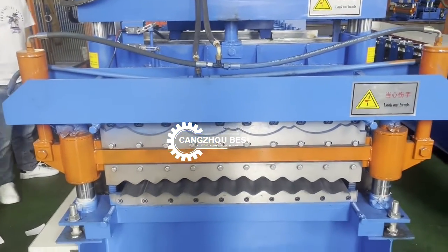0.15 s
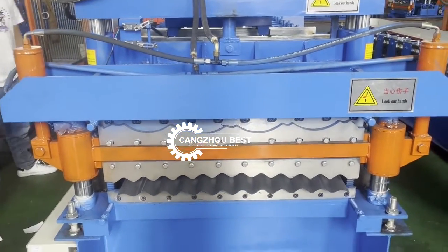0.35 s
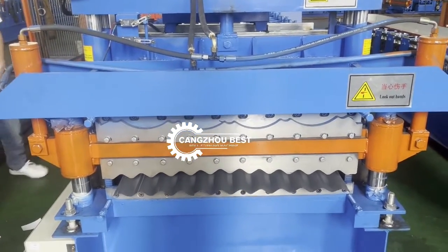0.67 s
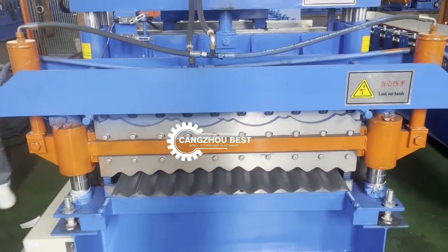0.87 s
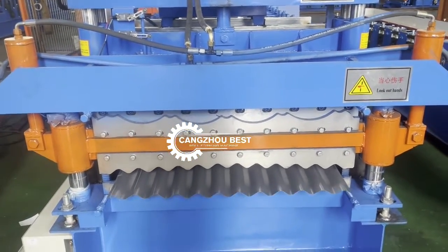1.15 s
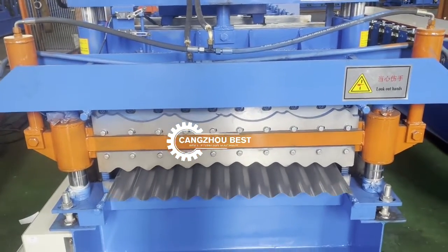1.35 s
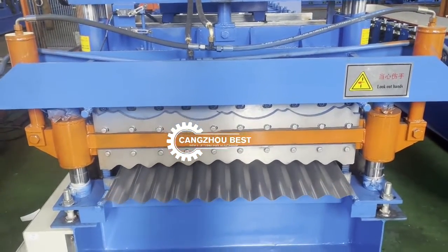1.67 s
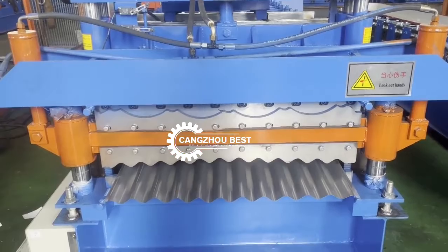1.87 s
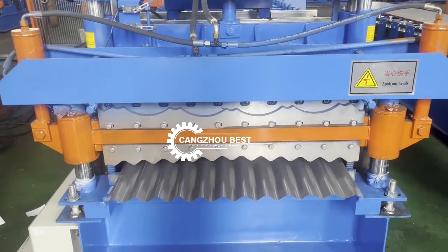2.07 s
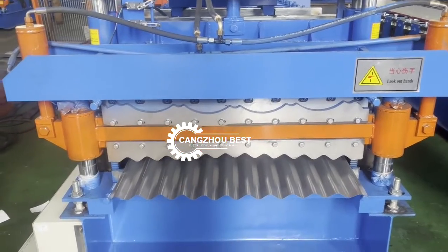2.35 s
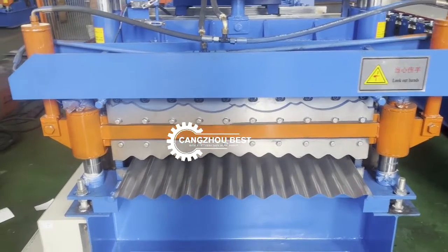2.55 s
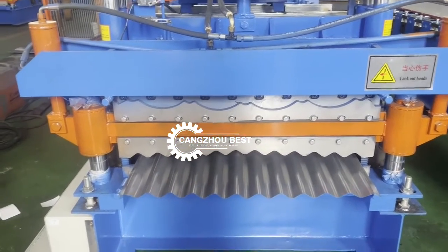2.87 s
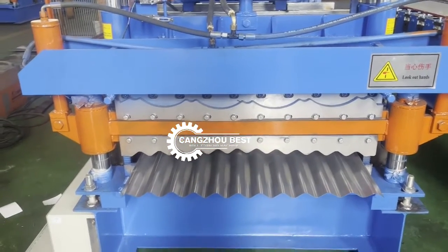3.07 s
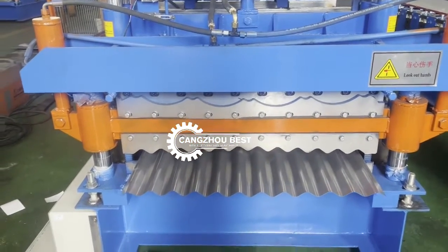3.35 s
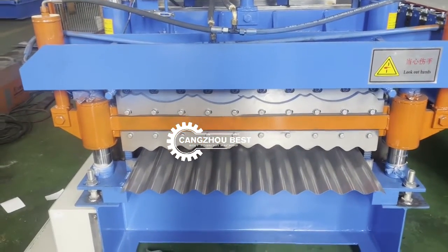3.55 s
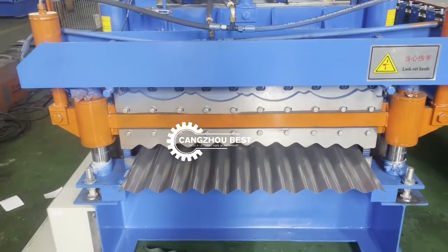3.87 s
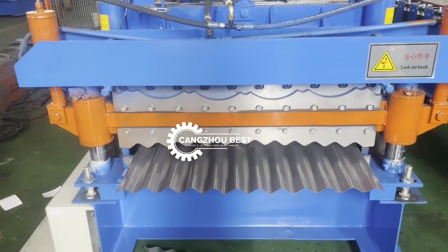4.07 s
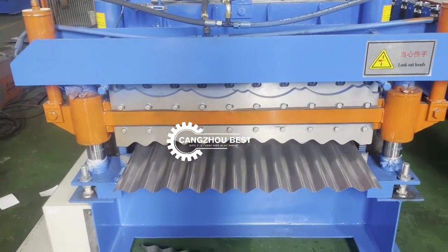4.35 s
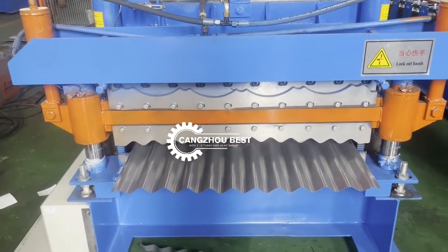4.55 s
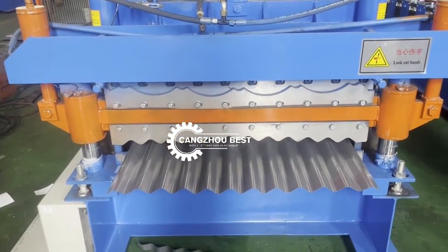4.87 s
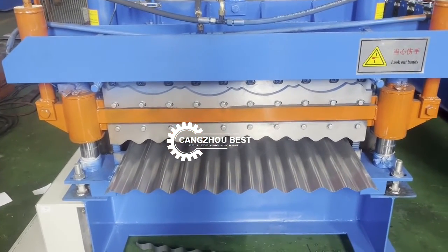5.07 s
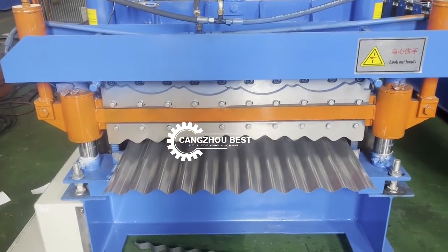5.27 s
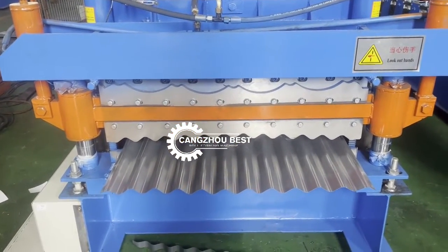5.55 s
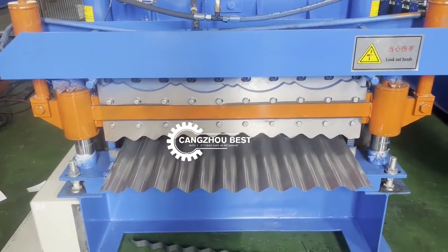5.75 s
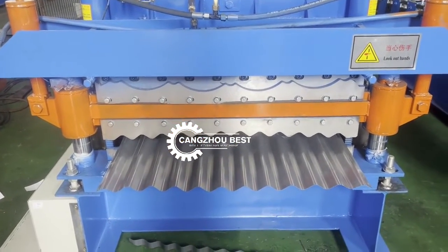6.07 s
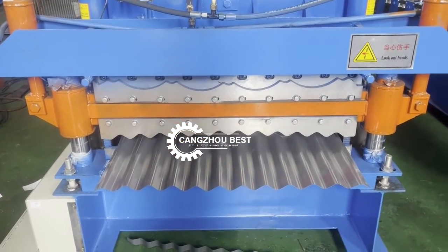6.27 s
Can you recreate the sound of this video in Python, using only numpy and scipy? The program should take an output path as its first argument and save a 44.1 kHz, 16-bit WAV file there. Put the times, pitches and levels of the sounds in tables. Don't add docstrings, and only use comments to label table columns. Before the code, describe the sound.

A low boom opens in a reverberant factory hall as thin steel sheet rumbles through rollers with thin high squeals. Around one and a half seconds it buckles in a loud rattle of metallic pops, then the rolling sinks away. Motor and gear whine continue underneath; near the end a loose plate chatters, with dull thuds and faint bearing chirps. Handheld stereo microphone.

```python
import sys
import numpy as np
from scipy import signal
from scipy.fft import rfft, irfft
from scipy.io import wavfile

SR = 44100
rng = np.random.default_rng(int(sys.argv[2]) if len(sys.argv) > 2 else 0)


def voltage_ratio(level):
    return 10 ** (np.asarray(level, float) / 20)


def master(y):
    cut = np.clip(np.atleast_2d(y).T, -1, 1)
    pcm = np.round(cut * 32767)
    wavfile.write(sys.argv[1], SR, pcm.astype(np.int16))


N = 283112
TIME = np.arange(N) / SR
BINS = np.maximum(np.arange(N // 2 + 1) * SR / N, 1)
SHAFT_HZ = 24.818


def rms_one(x):
    return x / np.sqrt(np.mean(x ** 2) + 1e-20)


def in_time(rows):
    s, *columns = np.transpose(rows)
    return [np.interp(TIME, s, c) for c in columns]


def colour(points):
    hz, level_db = np.transpose(points)
    return voltage_ratio(np.interp(np.log(BINS), np.log(hz), level_db))


def gate(s, length, attack, release):
    rise = (TIME - s) / attack
    fall = 1 + (s + length - TIME) / release
    return np.clip(np.minimum(rise, fall), 0, 1)


def drift(rate, count=2):
    r = np.exp(-128 * np.pi * rate / SR)
    white = rng.standard_normal((count, N // 64 + 1502))
    slow = signal.lfilter([1], [1, -2 * r, r * r], white)[:, 1500:]
    return np.array([np.interp(np.arange(N) / 64, np.arange(len(s)), rms_one(s)) for s in slow])


def noise(gain):
    return rms_one(irfft(rfft(rng.standard_normal((2, N))) * gain, N))


def hump(hz, width):
    return 1 / np.sqrt(1 + ((BINS - hz * hz / BINS) / width) ** 2)


def tone(hz, level_db, flutter_db, wander, rate, lead=0):
    cycles = np.cumsum(hz * np.ones(N)) / SR + rng.random()
    phase = 2 * np.pi * cycles + wander * drift(rate, count=1) - lead
    return np.sqrt(2) * voltage_ratio(level_db + flutter_db * drift(rate)) * np.sin(phase)


def strikes(events, modes):
    half = SR // 2
    out, age = np.zeros((2, N + SR)), TIME[:half]
    for s, peak_db in events:
        start = int(s * SR)
        for hz, level_db, t60 in modes:
            ring = np.sin(2 * np.pi * hz * rng.normal(1, .03) * age)
            ring *= (1 - np.exp(-age / .003)) * voltage_ratio(peak_db + level_db + 1 - 60 * age / t60)
            out[:, start:start + half] += ring * voltage_ratio(rng.normal(0, 3, (2, 1))) * rng.choice([-1, 1])
    return out[:, :N]


def sheet():
    # pitch_hz, level_db (per Hz)
    sheet_colour = [(20, -40), (32, -22), (50, -5), (97, 4.5), (175, -5), (565, -0.5), (650, -4.5),
                    (1500, -17.5), (4600, -36.5), (7000, -48), (8400, -48.5), (10000, -53.5), (13800, -56),
                    (15800, -52)]
    # pitch_hz, width_hz, lift_db
    panels = [(105, 41, -2.5), (143, 8.7, 3.5), (212, 10, 4.5), (300, 130, 3.5), (400, 45, -1),
              (507, 26, 0)]
    borders = [200, 800, 3000]
    # time_s, force_db (re steady feed)
    force = [(0, -0.5), (1.0, -0.5), (1.34, 1), (1.42, 5.5), (1.63, 8), (1.9, 7), (2.16, 1.5), (2.5, -0.5),
             (3.1, -3.5), (3.5, -9), (4.3, -11.5), (4.95, -13), (5.5, -9.5), (6.05, -9.5), (6.42, -9)]
    # level_db (steady feed), force_share, buckling_gain_db, flicker_db
    sheet_parts = [
        (-27, 1.22, -6, -1),
        (-23, 0.92, -0.8, -0.07),
        (-33, 0.59, 8.5, 1.25),
        (-40, 0.39, 1, 1.53),
    ]

    shape = colour(sheet_colour)
    for hz, width, lift_db in panels:
        shape = shape * (1 + (voltage_ratio(lift_db) - 1) * hump(hz, width))
    below = [0] + [1 / (1 + (BINS / hz) ** 6) for hz in borders] + [1]
    force_db, = in_time(force)
    buckling = gate(1.265, 0.5, attack=0.44, release=1.85)
    judder = drift(29, count=1)
    out = 0
    for low, high, part in zip(below, below[1:], sheet_parts):
        level_db, share, buckle_db, flicker_db = part
        flicker = 1.1 * judder + drift(4.7, count=1)
        part_db = level_db + share * force_db + buckle_db * buckling + flicker_db * flicker
        out = out + voltage_ratio(part_db) * noise(shape * np.sqrt(np.maximum(high - low, 0)))
    return out


def buckling_pops():
    # time_s, peak_db
    pops = [(1.371, -17), (1.399, -11), (1.423, -6), (1.459, -11), (1.529, -8), (1.585, -6), (1.634, -8),
            (1.661, -9), (1.711, -4), (1.739, -7), (1.799, -9), (1.879, -7), (1.992, -7)]
    # pitch_hz, level_db, t60_s
    pop_modes = [(150, -20, .35), (310, -21, .25), (405, -24, .2), (545, -15, .22), (680, -15, .15),
                 (760, -15, .15), (860, -15, .14), (1030, -17, .12), (1250, -21, .1), (1500, -26, .08)]
    return strikes(pops, pop_modes)


def squeals():
    # start_s, length_s, first_hz, last_hz, level_db
    squeal_lines = [(.25, .5, 3937, 3915, -46), (.76, .17, 3912, 3890, -45), (.96, .22, 3895, 3895, -45),
                    (1.27, .15, 3890, 3890, -52), (1.6, .2, 3905, 3918, -48), (1.82, .15, 3940, 3945, -51),
                    (.17, .28, 4058, 4070, -46.5), (.56, .15, 4072, 4080, -51),
                    (.68, .35, 4082, 4100, -45.5), (1.14, .5, 4102, 4115, -52), (.5, .22, 4235, 4255, -54),
                    (1.02, .16, 4305, 4315, -52), (2.48, .055, 5600, 5600, -49),
                    (2.57, .045, 5600, 5600, -49), (.06, .14, 4385, 4400, -52),
                    (2.64, .12, 5600, 5600, -57), (.8, 1.2, 5319, 5319, -65),
                    (1.95, 3.65, 5319, 5319, -59.5), (-.1, 6.6, 1395, 1395, -52),
                    (-.1, .5, 8020, 7930, -60), (.42, 1.6, 8170, 8120, -63), (.8, .6, 7800, 7760, -63),
                    (-.1, 6.6, 10670, 10670, -71), (-.1, 6.6, 10620, 10620, -73),
                    (-.1, 6.6, 10730, 10730, -73)]
    out = 0
    for s, length, first_hz, last_hz, level_db in squeal_lines:
        glide_hz = np.interp(TIME, [s, s + length], [first_hz, last_hz])
        line = tone(glide_hz, level_db + .5, flutter_db=2.3, wander=.5, rate=20, lead=np.c_[[0, .6]])
        out = out + gate(s, length, attack=.04, release=.05) ** 2 * line
    return out


def frame_hum():
    # start_s, length_s, level_db
    hums = [
        (0.436, 0.26, -26.5),
        (0.79, 0.42, -33.5),
        (1.137, 0.14, -30.5),
        (1.35, 0.29, -32),
        (1.676, 0.37, -32),
    ]
    load = sum(voltage_ratio(level_db) * gate(s, length, attack=0.077, release=0.11) for s, length, level_db in hums)
    return load * tone(143.3, 0, flutter_db=2.5, wander=0.8, rate=11)


def blows():
    # time_s, level_db, ring_hz, width_hz, t60_s
    noise_bursts = [(0, -23, 106, 60.5, 1.8), (.86, -30, 102, 60, 2.4), (1.13, -32, 305, 300, 0.31),
                    (1.34, -21, 212, 40, 1.05), (1.46, -23, 101, 40, 1.1), (1.56, -37, 3600, 3460, 3),
                    (1.42, -29, 900, 596, 3.9), (1.7, -31, 149, 60, 3.8), (2.05, -34, 1400, 300, .9),
                    (2.4, -26.5, 590, 120, 0.69), (4.42, -51, 11500, 6040, 0.53),
                    (1.6, -44, 11400, 4030, 0.81), (1.87, -21.5, 950, 500, 0.75), (1.95, -41, 825, 400, 1.2),
                    (2.08, -27, 75, 49, 4.4), (2.8, -28, 127, 79, 3.8), (3.58, -30, 335, 100, 1.1),
                    (5.0, -34.5, 375, 80, 2.5), (5.37, -34.5, 370, 99, 2.4), (5.49, -30, 170, 220, 0.74),
                    (5.91, -26.5, 130, 160, 0.9), (6.1, -46, 5470, 3000, 1.9), (.7, -56, 15300, 1200, 6),
                    (1.3, -61, 15200, 1200, 4), (1.86, -60, 14900, 900, 1), (4.34, -60, 15200, 1200, 2.5),
                    (5.07, -62, 15100, 1000, 1), (6.2, -62, 15200, 1000, 1), (.2, -27.5, 355, 78, 2.1),
                    (1.5, -38, 1180, 700, 3.5), (1.52, -26, 780, 300, 4), (1.97, -27, 795, 350, 3),
                    (5.5, -33.5, 420, 354, 4), (1.28, -47, 12000, 6000, 3)]
    white = rfft(rng.standard_normal((4, 2, N)))
    out = 0
    for k, (s, level_db, hz, width, t60) in enumerate(noise_bursts):
        age = np.maximum(TIME - s, 0)
        swell = voltage_ratio(level_db - 60 * age / t60) * (1 - np.exp(-age / 0.006))
        out = out + swell * rms_one(irfft(white[k % 4] * hump(hz, width) ** 2, N))
    return out


def thuds():
    # time_s, peak_db, pitch_hz, t60_s
    dull_thuds = [(-.002, -10.5, 118, 0.18), (1.13, -20, 290, 0.13), (5.046, -21, 351.5, 0.31),
                  (5.096, -23, 384, 0.28), (5.199, -27, 417, 0.25), (5.255, -26.5, 475, .25),
                  (5.375, -23.5, 363.5, 0.31), (5.495, -27.5, 149.7, 0.56), (5.535, -29, 454, .2),
                  (5.909, -23, 100, 0.38), (5.965, -25, 190, .3), (6.031, -27.5, 96, 0.58),
                  (6.138, -27, 338, 0.33), (6.19, -25.5, 523, 0.23)]
    s, peak_db, hz, t60 = np.transpose(dull_thuds)[:, :, None]
    age = np.maximum(TIME - s, 0)
    return np.sum(voltage_ratio(peak_db - 60 * age / t60) * np.sin(2 * np.pi * hz * age), axis=0)


def plate_chatter():
    # pitch_hz, level_db, t60_s
    plate_modes = [(300, -14, .2), (345, -9, .22), (385, -9, .22), (440, -10, .18), (540, -13, .15),
                   (660, -17, .12)]
    first_s, gap_s, peak_db, loss_db = 5.003, .0485, -18.5, 1
    knocks = [(first_s + k * gap_s, peak_db - abs(k - 1) * loss_db) for k in range(7)]
    return strikes(knocks, plate_modes)


def teeth():
    # shaft_multiple, left_db, right_db, mean_db (of both ports)
    tooth_lines = [(30, -47.0, -47.0, -54.0), (35, -43.0, -45.0, -62.0), (36, -46.0, -50.0, -48.0),
                   (37, -45.0, -48.0, -46.0), (39, -57.0, -50.0, -52.0), (41, -46.5, -45.0, -46.0),
                   (42, -47.0, -49.0, -48.5), (47, -51.0, -54.0, -53.0), (52, -52.0, -52.0, -61.0),
                   (57, -51.0, -54.0, -52.0), (60, -49.0, -47.0, -50.0), (80, -55.0, -60.0, -57.0),
                   (94, -58.0, -56.0, -58.0), (100, -47.0, -46.0, -47.0), (101, -55.0, -58.0, -59.0),
                   (110, -48.0, -51.0, -51.0), (116, -50.0, -52.0, -51.0), (120, -57.0, -57.0, -58.0),
                   (126, -52.0, -56.0, -55.0), (127, -44.0, -45.0, -45.8), (136, -53.0, -59.0, -58.0),
                   (139, -48.0, -55.0, -52.0), (140, -47.0, -53.0, -50.0), (147, -55.0, -70.0, -60.0),
                   (157, -55.0, -56.0, -58.0), (174, -59.0, -74.0, -65.0), (177, -60.0, -58.0, -59.0),
                   (184, -59.0, -68.0, -62.0), (220, -65.0, -67.0, -69.0), (235, -68.0, -67.0, -69.0)]
    out = 0
    for order, left_db, right_db, mean_db in tooth_lines:
        left, right, both = voltage_ratio(left_db), voltage_ratio(right_db), 2 * voltage_ratio(mean_db)
        cosine = (both ** 2 - left ** 2 - right ** 2) / (2 * left * right)
        lead = np.arccos(np.clip(cosine, -1, 1))
        slack_db = -5 * (order == 127) * gate(2.1, 1.2, attack=.3, release=.1)
        level_db = np.c_[[left_db, right_db]] - 1 + 1.3 * (order < 62) + slack_db
        out = out + tone(order * SHAFT_HZ, level_db, flutter_db=3.3 + (order > 61), wander=.55,
                         rate=6 + order / 7, lead=lead * np.c_[[0, 1]])
    return out


def drive():
    # pitch_hz, level_db (per Hz)
    drive_colour = [(25, -23), (50, 3.5), (290, -13.5), (400, 0.5), (630, -18.5), (980, -2), (1250, -11),
                    (3200, -13.5), (4500, -17), (7000, -27.5), (8600, -30.5), (10600, -30.5), (14000, -34),
                    (15800, -50)]
    shape = colour(drive_colour)
    flow = voltage_ratio(-33.5 + 0.12 * drift(4.6, count=1)) * noise(shape)
    orders_hz = np.arange(513) * SHAFT_HZ
    strength = np.interp(orders_hz, BINS, shape * (BINS > 600)) * voltage_ratio(3 * rng.standard_normal((2, 513)))
    pattern = irfft(strength * np.exp(2j * np.pi * rng.random((2, 513))))
    turn = (TIME * SHAFT_HZ % 1) * 1024
    repeat = np.array([np.interp(turn, np.arange(1025), np.append(p, p[0])) for p in pattern])
    return flow + voltage_ratio(-42.0) * rms_one(repeat)


def chirps():
    chirp_db = [-70, -65, -58, -58, -55, -59, -60]
    first_s, turn_s, length_s = 5.13, .197, .1
    age = np.maximum(TIME - first_s - turn_s * np.c_[:len(chirp_db)], 0) / length_s
    turns = voltage_ratio(np.c_[chirp_db] + 3) * np.minimum(age * 8, 1) * np.exp(-age ** 2)
    return turns.sum(axis=0) * noise(hump(13220, 160) ** 2)


def ports(field, direct):
    # pitch_hz, likeness (0-1), left_lead_rad, left_minus_right_db
    port_pair = [(40, 1, 0, -1.5), (170, 0.82, 0.03, -2.5), (320, 0.83, .5, -1.5), (500, 0.39, 1.03, -.5),
                 (700, 0.46, 2.5, 0), (950, .15, 2, 2.5), (1280, 0, 3, -6), (1800, 0.18, 2, 1.5),
                 (2310, 0.52, 0.5, 1), (3000, 0.5, 1.9, 0.5), (3980, 0.28, -0.4, 7.5),
                 (4130, 0.43, -1.1, 0.5), (5140, 0.47, 2, 4.5), (5570, 0.25, 0.5, 4),
                 (5980, 0.54, -1.17, 2), (7840, 0.8, -2.5, 0.5), (9680, 0.38, -4, -0.5),
                 (11900, 0.4, -6.5, 2), (13800, 0.5, -9, 0), (15300, .7, -3, 0)]
    # pitch_hz, added_likeness (0-1)
    direct_likeness = [(300, 0), (500, 0), (950, 0.42), (1350, 0.44), (1800, 0)]
    hz, *columns = np.transpose(port_pair)
    alike, lead, balance_db = [np.interp(BINS, hz, c) for c in columns]
    alike = np.clip(alike + direct * np.interp(BINS, *np.transpose(direct_likeness)), 0, 1)
    first, second = rfft(field)
    right = alike * np.exp(-1j * lead) * first + np.sqrt(1 - alike ** 2) * second
    return voltage_ratio(1.0) * irfft([first * voltage_ratio(balance_db / 2), right * voltage_ratio(-balance_db / 2)], N)


def scene():
    # time_s, level_db
    drive_level = [(0.0, -36), (1.2, -36.5), (1.9, -34.5), (2.15, -40.5), (3.0, -42.5), (4.4, -38.5),
                   (6.42, -38)]
    level_db, = in_time(drive_level)
    load = voltage_ratio(level_db - np.mean(level_db))
    field = sheet() + buckling_pops() + squeals() + frame_hum()
    field = field + blows() + plate_chatter() + load * drive() + chirps()
    near = gate(1.28, .8, attack=0.17, release=0.17)
    heard = (1 - near) * ports(field, False) + near * ports(field, True)
    return heard + np.sqrt(load) * teeth() + thuds()


def top_cut(x):
    return signal.sosfilt(signal.butter(12, 15750, fs=SR, output="sos"), x)


def record(dry):
    mix = 1.32 * np.tanh(dry / 1.285)
    return top_cut(mix)


dry = scene()
out = record(dry)
master(out)
```